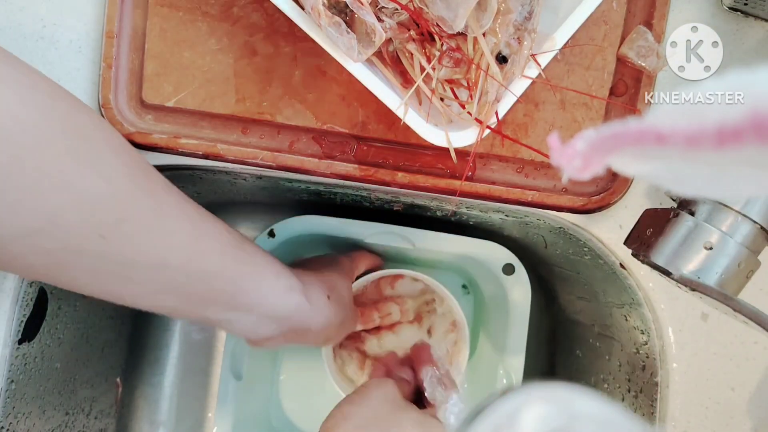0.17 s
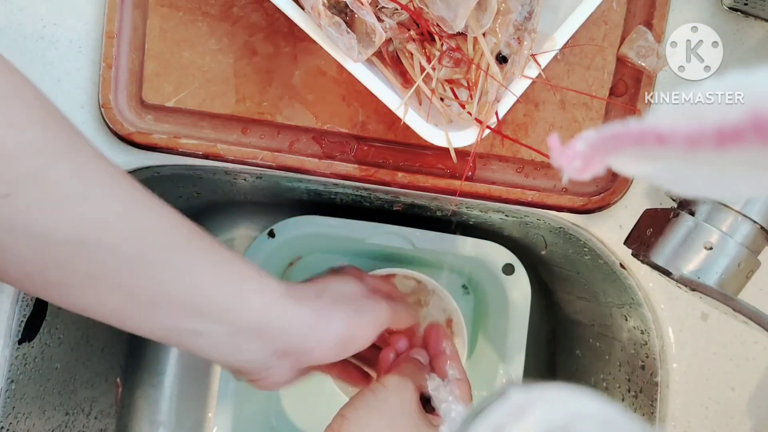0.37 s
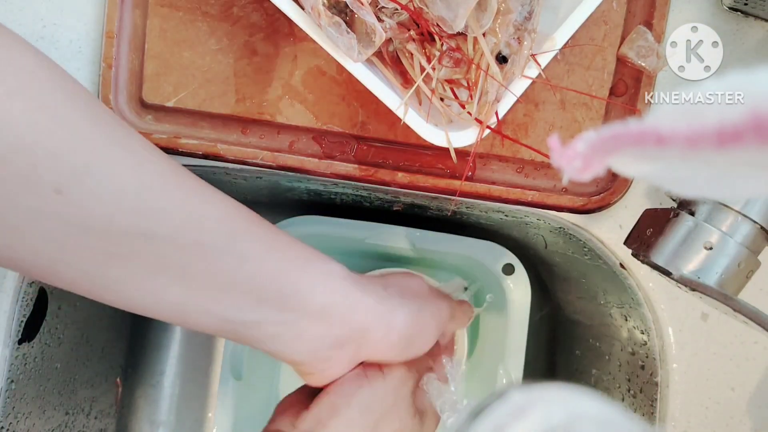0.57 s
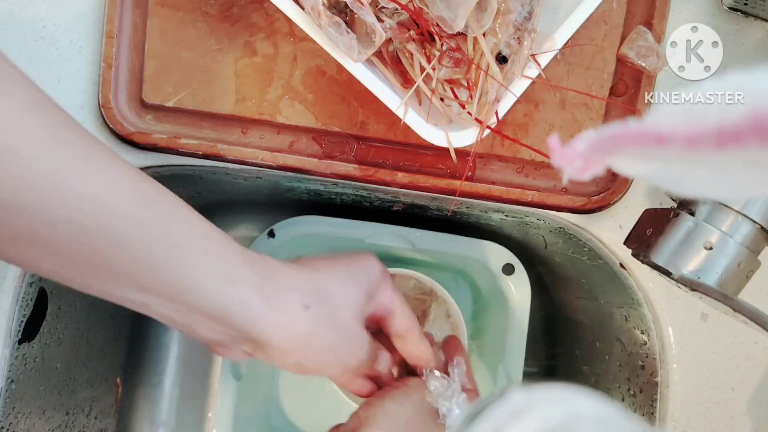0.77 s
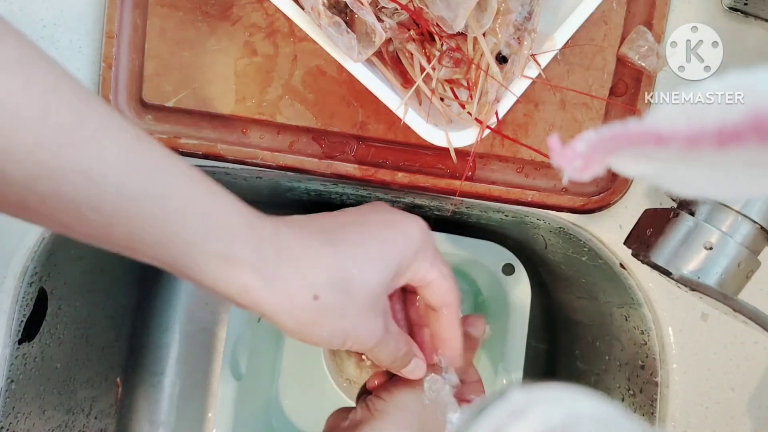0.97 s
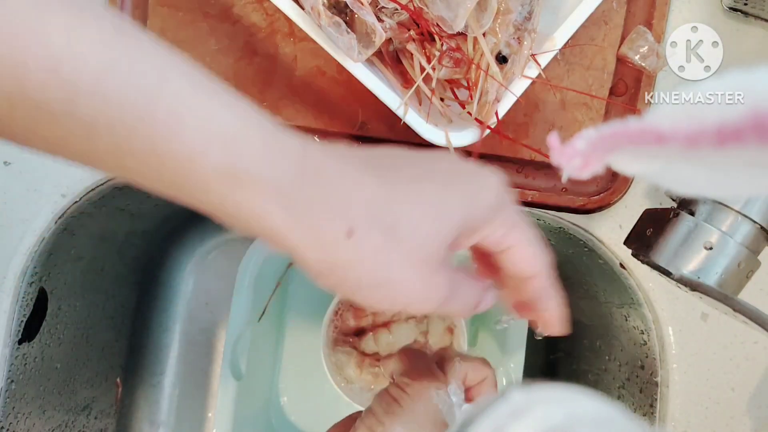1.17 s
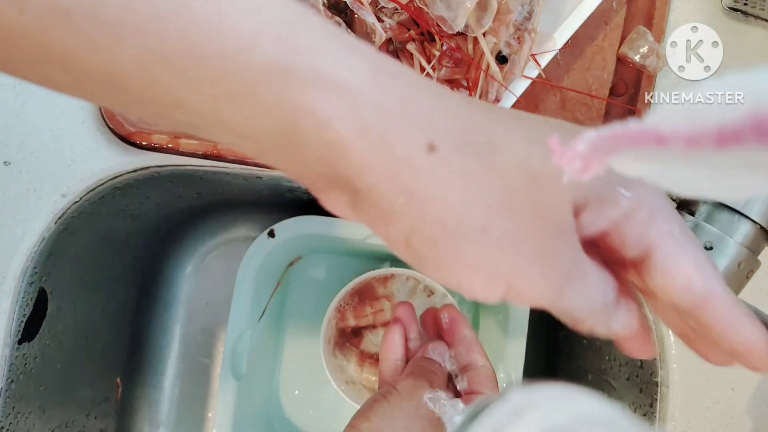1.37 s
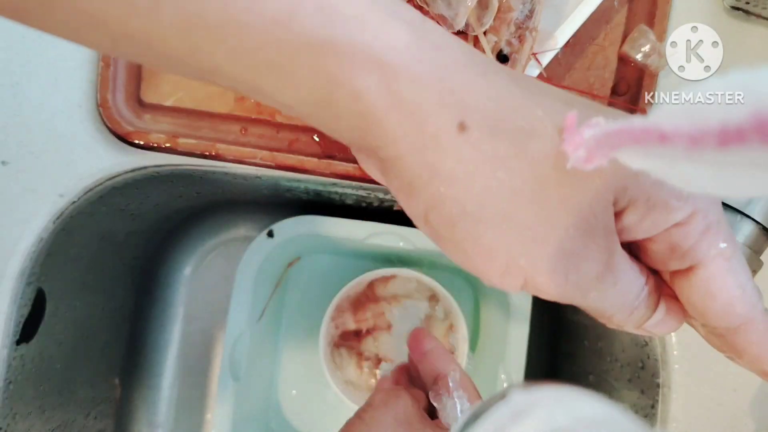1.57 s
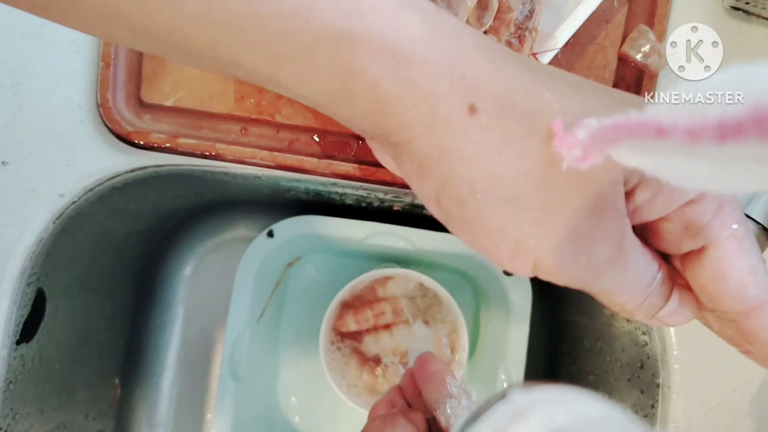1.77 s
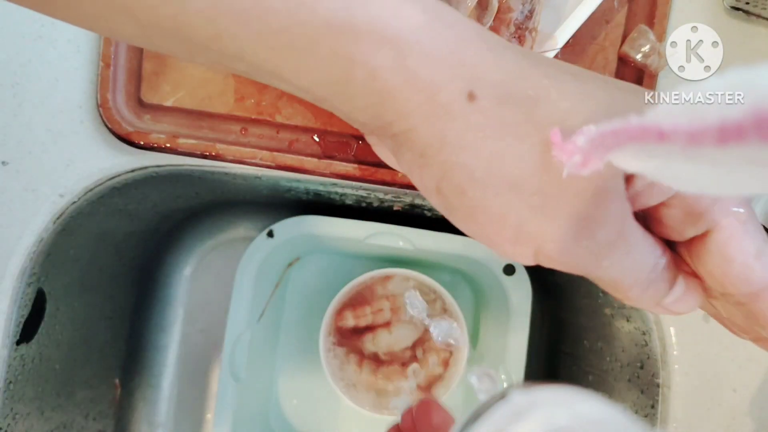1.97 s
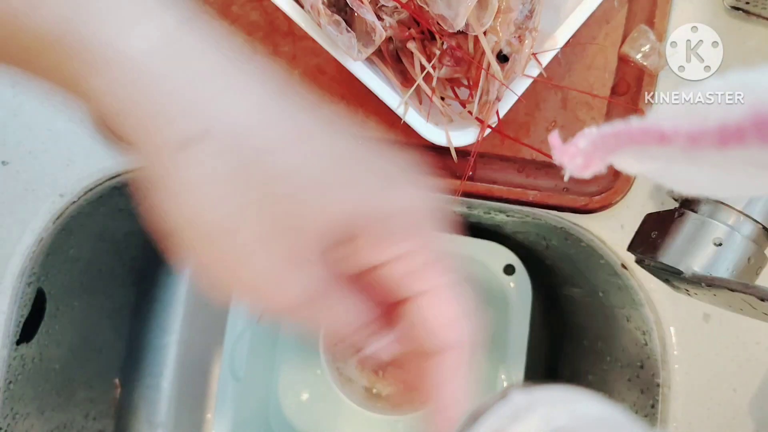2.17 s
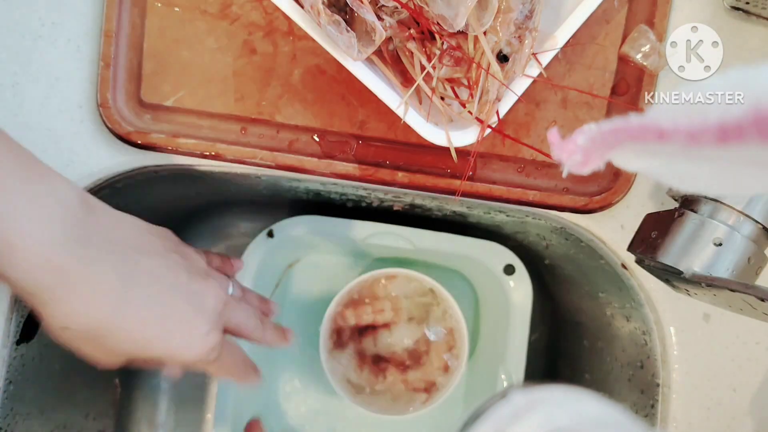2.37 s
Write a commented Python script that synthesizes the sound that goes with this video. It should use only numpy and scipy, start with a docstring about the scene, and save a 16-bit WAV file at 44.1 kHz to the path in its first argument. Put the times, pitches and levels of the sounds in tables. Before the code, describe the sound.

Water splashes and patters unevenly into a plastic basin in a steel sink, close, in a small kitchen. From 0.23 to 0.3 seconds the basin knocks loudly with a hollow boom and clatter; duller knocks follow at 0.43 and 0.5. Fat drops and spurts continue, bubbles blip around 1.2 and 1.4, splashes strengthen from 1.5 to 2.3, then the flow stops, leaving low slosh and a last drip at 2.4.

```python
"""Kitchen tap over a basin in a steel sink

A tap runs over hands into a bowl in a plastic basin: damped droplet tones over noise make the stream.
Clustered tones make fat drops, rising tones make trapped bubbles, and filtered noise makes drumming and slosh.
Basin knocks excite ringing walls and the booming sink floor; random decaying tails give sink and kitchen.
Near the end the tap is shut: low sloshing and a last drip remain."""
import sys
import numpy as np
from scipy import signal
from scipy.fft import rfft, irfft
from scipy.io import wavfile

SR = 44100
rng = np.random.default_rng(int(sys.argv[2]) if len(sys.argv) > 2 else 0)


def file_out(sig):
    """Save sig as 16-bit WAV at sys.argv[1]."""
    # one column per channel
    cols = np.atleast_2d(sig).T
    # limit, then scale
    lim = np.clip(cols, -1, 1)
    pcm = np.round(lim * 32767).astype(np.int16)
    wavfile.write(sys.argv[1], SR, pcm)


N = 110250
T = np.arange(N) / SR


def from_db(db):
    """Level law: decibels to amplitude gain."""
    return 10 ** (np.asarray(db) / 20)


def rms_one(x):
    """Power normalisation: scale to rms 1."""
    return x / np.sqrt(np.mean(x ** 2) + 1e-20)


def at_hz(points, hz):
    """Linear interpolation of a table on a logarithmic frequency axis."""
    f, v = np.transpose(points)
    return np.interp(np.log(hz + 1e-9), np.log(f), v)


def at_time(points):
    """Linear interpolation of a table over the whole duration."""
    return np.interp(T, *np.transpose(points))


def fade(t, t60):
    """Exponential decay: 60 dB down after t60 seconds."""
    return np.exp(-np.log(1000) * t / max(t60, 1e-4))


def ring(hz, t):
    """Simple harmonic motion at a fixed frequency."""
    return np.sin(2 * np.pi * hz * t)


def pan(db):
    """Interaural level difference: left and right gains."""
    return from_db(np.array([[.5], [-.5]]) * db)


def filt(x, hz, kind, order=2):
    """Butterworth filtering: a maximally flat passband."""
    sos = signal.butter(order, np.clip(hz, 10, .45 * SR), kind, fs=SR, output="sos")
    return signal.sosfilt(sos, x)


def add(out, s, x):
    """Superposition: mix a sound in at time s."""
    i = max(int(s * SR), 0)
    out[:, i:i + x.shape[-1]] += x[..., :N - i]


def drift(rate):
    """Low-passed white noise: a random fluctuation of rms 1, corner near rate in Hz."""
    r = np.exp(-2 * np.pi * rate / SR)
    wander = signal.lfilter([1], [1, -2 * r, r * r], rng.standard_normal(2 * N))
    return rms_one(wander[N:])  # the first half lets the filter settle


# Left-right coherence of the sound field: f/Hz, coherence [0-1]
COHERENCE = [(100, 0.99), (290, 0.78), (640, 0.08), (3000, 0.66), (9000, 0.04)]
# Stereo balance of the water, leaning left in the treble: f/Hz, left minus right level/dB
BALANCE = [(700, -1), (2400, 1), (4400, 1.5), (7000, 5.5), (10000, 0)]


def noise(spectrum):
    """Spectral shaping of partly coherent stereo noise, rms 1."""
    hz = np.arange(N // 2 + 1) * SR / N
    mid, side = rfft(rng.standard_normal((2, N)))
    alike = np.clip(at_hz(COHERENCE, hz), 0, 1)
    both = np.sqrt(1 + alike) * mid + np.sqrt(1 - alike) * side * [[1], [-1]]
    return rms_one(irfft(both * from_db(at_hz(spectrum, hz)) * pan(at_hz(BALANCE, hz)), N))


def echoes(x, t60, low_hz, high_hz):
    """Diffuse reverberation: convolution with dying noise of unit energy, different on each side."""
    t = T[:SR // 2]
    tail = filt(rng.standard_normal((2, len(t))), [low_hz, high_hz], "band")
    tail = tail * fade(t, t60) * (t > .001)
    tail /= np.sqrt(np.sum(tail ** 2, axis=1, keepdims=True))
    return signal.fftconvolve(x, tail, axes=1)[:, :N]


# Relative spectral density of the splash: f/Hz, level/dB per Hz
SPLASH_SPECTRUM = [(300, -8), (700, -16), (1400, -13.5), (2300, -1.5), (3600, -2), (5400, 1), (7500, 0),
                   (9500, -11.5), (15000, -17.5)]
PATTER_PER_S, PATTER_SPREAD_DB = 1300, 4.5  # rate before spurts; scale of the random size in level
PATTER_RING_CYCLES, PATTER_RISE = 40, 0.045  # median t60 in cycles; fractional pitch rise by t60
MAX_LAG_S = 0.000406  # largest left-right delay


def patter(spurt_db):
    """Droplet and microbubble resonance: random decaying tones whose pitch rises as they die."""
    out, t = np.zeros((2, N)), T[:SR // 40]
    born = T[rng.random(N) < PATTER_PER_S * from_db(spurt_db) / SR]
    for s, (pitch, size, length, side, lag) in zip(born, rng.random((len(born), 5))):
        hz = 1100 + 11000 * pitch ** 1.4
        t60 = PATTER_RING_CYCLES * 2 ** (2 * length - 1) / hz
        age = np.maximum(t - MAX_LAG_S * np.array([[lag], [1 - lag]]), 0)
        rise = 1 + PATTER_RISE * np.minimum(age / t60, 1) / 2  # mean pitch factor so far
        blip = ring(hz * rise, age) * fade(age, t60) * (1 - np.exp(-age * hz))
        db = at_hz(SPLASH_SPECTRUM, hz) + PATTER_SPREAD_DB * min(-np.log(size), 4)
        place = pan(at_hz(BALANCE, hz) + 12 * (side - .5))
        add(out, s, from_db(db) * hz ** 0.69 * place * blip)
    return rms_one(out)


# Uneven strength of the splashing flow: t/s, level/dB
FLOW_LEVEL = [(0, -40), (.13, -37), (.22, -38.5), (.40, -35.5), (.77, -39.5), (.81, -48.5), (.86, -47),
              (.89, -36), (1.02, -36.5), (1.10, -41.5), (1.22, -36.5), (1.29, -48.5), (1.40, -40.5),
              (1.47, -46.5), (1.52, -32.5), (1.72, -38), (1.83, -30.5), (1.90, -46), (1.96, -31.5),
              (2.17, -37), (2.24, -33), (2.32, -81), (2.5, -57)]
# Relative spectral density of the fine spray: f/Hz, level/dB per Hz
MIST_SPECTRUM = [(2000, -49), (7000, -5), (14000, -11)]
# Strength of the fine spray before flicker: t/s, level/dB
SPRAY_LEVEL = [(0, -39), (.25, -42), (.77, -35.5), (.83, -52), (.93, -37.5), (1.12, -35.5), (1.34, -40.5),
               (1.47, -40.5), (1.6, -34), (1.9, -41.5), (1.97, -28.5), (2.14, -60), (2.23, -29),
               (2.29, -41.5), (2.37, -47.5), (2.5, -56.5)]
SPURT_DB, SPURT_HZ, PATTER_DB, HISS_DB = 1.5, 22, -1, -4
MIST_FLICKER_DB, MIST_CRACKLE_DB = 2.0, 3.5  # rms of the slow and fast level changes


def stream():
    """Amplitude modulation: patter and hiss follow the flow, beside a crackling spray; all spurt."""
    spurt_db = SPURT_DB * drift(SPURT_HZ)
    flicker_db = MIST_FLICKER_DB * drift(30) + MIST_CRACKLE_DB * drift(750)
    mist = from_db(at_time(SPRAY_LEVEL) + flicker_db) * noise(MIST_SPECTRUM)
    splash = from_db(PATTER_DB) * patter(spurt_db) + from_db(HISS_DB) * noise(SPLASH_SPECTRUM)
    return from_db(spurt_db) * (from_db(at_time(FLOW_LEVEL)) * splash + .5 * mist)


# Relative spectral density of the stream drumming on the basin: f/Hz, level/dB per Hz
DRUM_SPECTRUM = [(25, -65), (55, -20.5), (90, -4), (150, 0), (205, -7.5), (270, 2), (350, -11),
                 (700, -12.5), (1200, -16), (3000, -62), (15000, -68)]
DRUM_DB = -48.5


def drumming():
    """Random forcing: the stream drums on the basin as fluctuating low noise."""
    return from_db(DRUM_DB + 1.84 * drift(12.6)) * noise(DRUM_SPECTRUM)


# Strength of the water sloshing in the basin: t/s, level/dB
SLOSH_LEVEL = [(0, -52), (1.45, -66), (1.5, -37.5), (1.56, -67), (2.04, -46), (2.075, -28.5), (2.17, -39),
               (2.225, -35), (2.265, -47.5), (2.33, -36), (2.36, -41.5), (2.435, -35.5), (2.5, -49.5)]
# Relative spectral density of its hollow colour: f/Hz, level/dB per Hz
SLOSH_SPECTRUM = [(50, -36), (150, -10), (235, -11.5), (268, 7), (305, -5.5), (460, -14), (700, -26.5),
                  (4000, -40)]


def sloshing():
    """Resonant colouring: sloshing is noise with a hollow spectral peak and a moving level."""
    return from_db(at_time(SLOSH_LEVEL)) * noise(SLOSH_SPECTRUM)


# Fat drops and spits: t/s, snap level/dB before trim, centre f/Hz, spray level/dB before trim
FAT_DROPS = [(0.0798, -21.5, 2450, -56), (0.118, -24, 3270, -27.5), (0.5937, -22.5, 2980, -27.5),
             (0.6411, -24.5, 2490, -25.5), (0.7031, -16, 7000, -34.5), (0.7434, -22.5, 4330, -48),
             (0.8686, -33.5, 4060, -33), (0.9447, -22, 3440, -30), (1.1651, -17.5, 2160, -59),
             (1.1893, -17, 2350, -58), (1.3879, -20.5, 5780, -33.5), (1.496, -20.5, 4040, -29),
             (1.5558, -18, 4020, -29), (1.6396, -13, 4860, -31), (1.7462, -17, 2736, -24),
             (1.8147, -17.5, 2556, -26.5), (1.933, -26, 6470, -28.5), (2.0368, -11, 5890, -32),
             (2.0553, -34, 7900, -29), (2.1, -18, 2935, -21.5), (2.1482, -21.5, 2870, -24.5),
             (2.229, -18.5, 2324, -21), (2.288, -16.5, 11900, -33.5), (2.3894, -22, 6850, -46)]
DROP_DB, SPRAY_DB = -8, -1.5  # common trims
DROP_RING_CYCLES, DROP_WIDTH, SPRAY_T60_S = 72.5, 0.224, 0.035  # t60 in cycles; fractional half-spread


def drops():
    """Clustered bubble resonance: each drop snaps around one pitch, with a puff of noise."""
    out, t, spray = np.zeros((2, N)), T[:SR // 8], noise(SPLASH_SPECTRUM)
    for s, db, hz, spray_db in FAT_DROPS:
        pitches = hz * (1 + DROP_WIDTH * (np.linspace(-1, 1, 6) + rng.normal(0, .15, 6)))
        burst = np.sin(2 * np.pi * (pitches[:, None] * t + rng.random((6, 1)))).sum(axis=0)
        dying = fade(t, DROP_RING_CYCLES / hz) * (1 - np.exp(-2 * t * hz))
        # same power as the envelope, however the six phases interfere
        snap = rms_one(burst * dying) * np.sqrt(np.mean(dying ** 2))
        puff = np.roll(spray, int(s * SR), axis=1)[:, :len(t)] * fade(t, SPRAY_T60_S)
        snap = from_db(db + DROP_DB) * pan(at_hz(BALANCE, hz)) * snap
        add(out, s, snap + from_db(spray_db + SPRAY_DB) * puff)
    return out


# Modes of the basin and sink walls: f/Hz, corner-struck level/dB, side-struck level/dB, t60/s
WALL_MODES = [(195.4, -5, -14, 0.21), (349, -12.5, -1, 0.17), (422.6, -24.5, -4.5, 0.2),
              (537.5, -15.5, -10.5, 0.17), (766, -13, -4.5, 0.15), (943, -0.5, 1, 0.052),
              (1120, -22, -9, 0.2), (1223, -7.5, -4, 0.097), (1363, 7, -38, 0.025), (1960, -4, -3, 0.027),
              (2414, -19, 0.5, 0.028), (2955, -19, -16, 0.083)]
WALL_DB, WALL_ROUGHNESS = -6.5, 0.53  # common trim; phase waver of the wet walls in radians


def ringing_walls(place, t):
    """Modal superposition: the struck place weights the wall modes, whose phases waver."""
    walls = 0
    for k, (hz, corner_db, side_db, t60) in enumerate(WALL_MODES):
        db = np.interp(place, [0, 1], [corner_db, side_db]) + rng.normal(0, 1)
        incoherence = 1 - np.clip(at_hz(COHERENCE, hz), 0, 1)
        apart = rng.normal(1.0, 0.63) * np.array([[1], [-1]]) * incoherence  # left-right phase
        waver = WALL_ROUGHNESS * drift(46)[:len(t)]
        phase = 2 * np.pi * hz * rng.normal(1, 0.0078) * t + apart + waver
        walls = walls + (-1) ** k * from_db(db) * np.sin(phase) * fade(t, t60)
    return from_db(WALL_DB) * walls


CRACK_DB, CRACK_T60_S, CRACK_LOW_HZ, RATTLE_DB, RATTLE_T60_S = 10.5, 0.019, 573, -14, 0.33


def crack_and_rattle(t):
    """Impact noise: high-passed grit with a fast and a slow decay."""
    grit = filt(rng.standard_normal((2, len(t))), CRACK_LOW_HZ, "high")
    return grit * (from_db(CRACK_DB) * fade(t, CRACK_T60_S) + from_db(RATTLE_DB) * fade(t, RATTLE_T60_S))


# Basin knocking on the sink: t/s, deep boom level/dB, upper boom level/dB, time to fall 20 dB/s,
# clatter level/dB, contact low-pass f/Hz, place [0 corner - 1 side]
BASIN_KNOCKS = [(0.2314, -12, -21.5, 0.07, -4.5, 2280, 0), (0.264, -35, -13.5, 0.024, -12, 910, 0),
                (.2900, -33.5, -35, 0.18, -11.5, 2410, 0.0026),
                (0.2957, -18, -31, 0.039, -14.5, 7000, 0.22), (0.432, -26, -15.5, 0.14, -7.5, 2120, 0.93),
                (0.4955, -44, -12, 0.011, -17, 514, 0.99), (1.744, -57, -44, 0.073, -29, 1050, 0.83),
                (2.062, -42.5, -25, 0.085, -26, 447, 1)]
# The two lowest modes of the sink floor: f/Hz
FLOOR_MODES_HZ = [158.7, 273.7]
BOOM_SWELL_S, CONTACT_S, HAND_DAMPING = 0.0056, 0.0014, 3  # two rise times; exponent of the damping
THUMP_DB, THUMP_HZ, THUMP_T60_S = 0.5, 320, 0.0246  # level relative to the upper boom


def knocks():
    """Impact excitation: walls ring and grit cracks, with a thump and hand-damped floor booms."""
    booms, clatter, t = np.zeros((2, N)), np.zeros((2, N)), T[:SR // 2]
    for s, deep_db, upper_db, length, clatter_db, bright_hz, place in BASIN_KNOCKS:
        damped = .1 ** ((t / length) ** HAND_DAMPING) * (1 - np.exp(-t / BOOM_SWELL_S))
        for db, hz in zip((deep_db, upper_db), FLOOR_MODES_HZ):
            add(booms, s, from_db(db) * ring(hz, t) * damped)
        add(booms, s, from_db(upper_db + THUMP_DB) * ring(THUMP_HZ, t) * fade(t, THUMP_T60_S))
        contact = 1 - np.exp(-t / CONTACT_S)
        blow = contact * (ringing_walls(place, t) + crack_and_rattle(t))
        add(clatter, s, from_db(clatter_db) * filt(blow, bright_hz, "low", order=3))
    return filt(booms, 91, "high", order=3), filt(clatter, 60, "high")


# Trapped air bubbles: t/s, starting level/dB, starting f/Hz, t60/s
TRAPPED_BUBBLES = [(1.167, -33, 1966, 0.13), (1.173, -38, 2430, 0.21), (1.352, -36, 930, 0.092),
                   (1.41, -38, 936, 0.067), (1.44, -31.5, 2040, 0.026), (2.143, -30, 989, 0.055),
                   (2.151, -27.5, 1160, 0.034), (2.227, -39, 1355, 0.033)]
BUBBLE_RISE_PER_S, BUBBLE_WOBBLE = .5, .024  # fractions of the pitch


def bubbles():
    """Bubble resonance: trapped air rings as a decaying tone, wobbling and rising in pitch."""
    out, t = np.zeros((2, N)), T[:SR // 5]
    for s, db, hz, t60 in TRAPPED_BUBBLES:
        pitch = hz * (1 + BUBBLE_RISE_PER_S * t + BUBBLE_WOBBLE * drift(170)[:len(t)])
        add(out, s, from_db(db) * fade(t, t60) * np.sin(2 * np.pi * np.cumsum(pitch) / SR))
    return out


ROOM_T60_S, ROOM_DB, SINK_T60_S, SINK_DB, KNOCK_WET_DB = 0.2, -9.5, 0.029, -2.5, -1


def scene():
    """Superposition of direct and reverberant sound: water and knocks in a sink in a small kitchen."""
    booms, clatter = knocks()
    splashes = drops() + bubbles()
    sink = from_db(SINK_DB) * echoes(splashes, SINK_T60_S, low_hz=580, high_hz=12100)
    water = stream() + splashes + sink
    basin = drumming() + sloshing()
    room = echoes(water + from_db(KNOCK_WET_DB) * clatter, ROOM_T60_S, low_hz=278, high_hz=6760)
    return water + booms + clatter + basin + from_db(ROOM_DB) * room


CUTOFF_HZ = 15650


def record(dry):
    """Saturation and band limiting: tanh rounds the peaks, a zero-phase low-pass cuts the top."""
    low_pass = signal.ellip(10, .1, 60, CUTOFF_HZ, fs=SR, output="sos")
    return signal.sosfiltfilt(low_pass, np.tanh(dry))


dry = scene()
out = record(dry)
file_out(out)
```